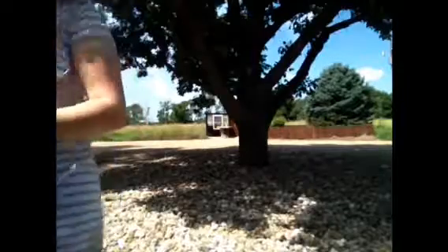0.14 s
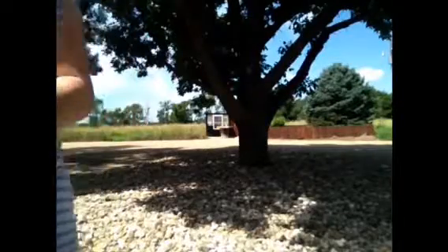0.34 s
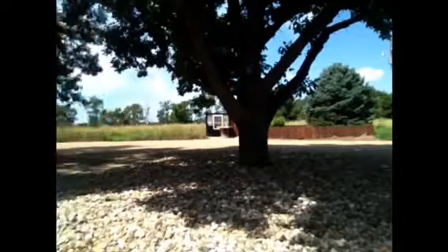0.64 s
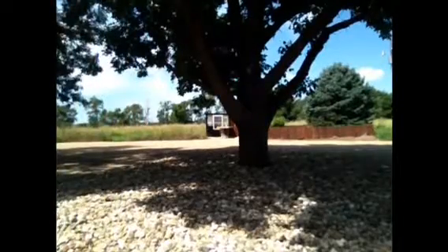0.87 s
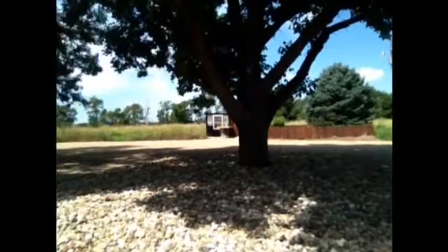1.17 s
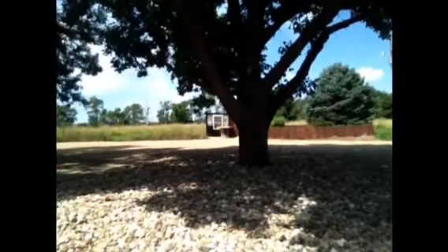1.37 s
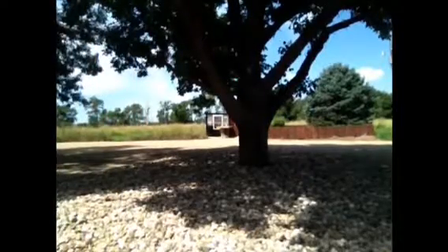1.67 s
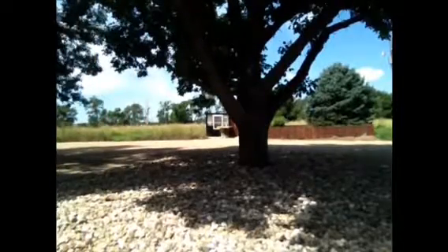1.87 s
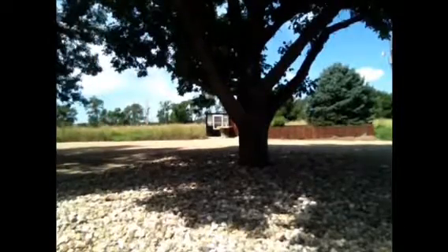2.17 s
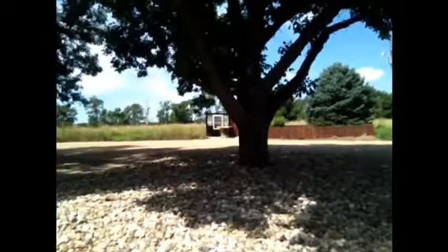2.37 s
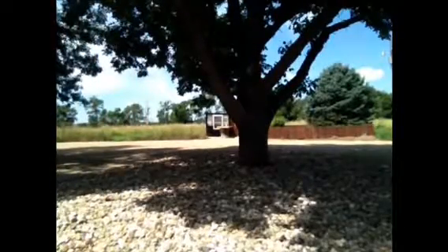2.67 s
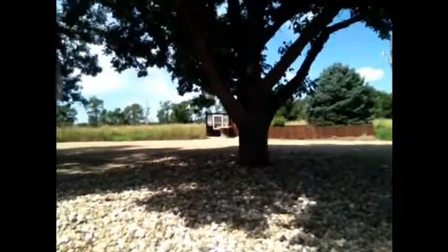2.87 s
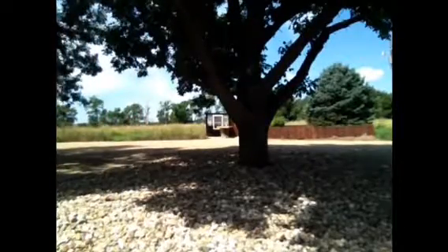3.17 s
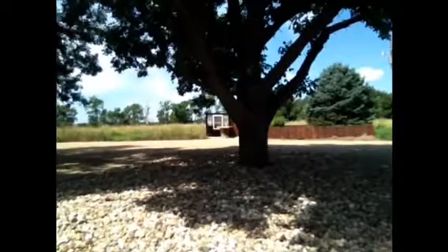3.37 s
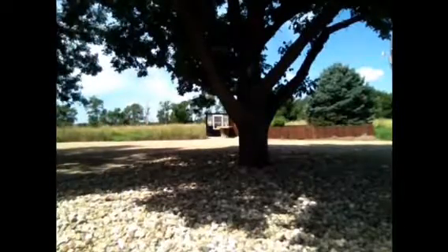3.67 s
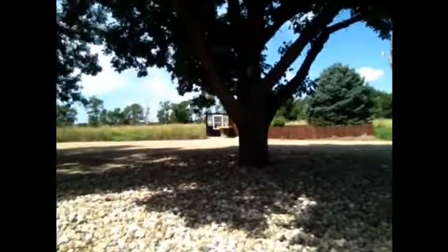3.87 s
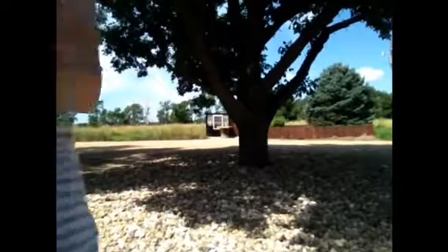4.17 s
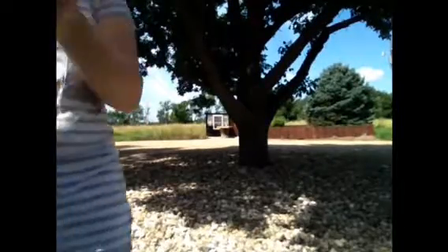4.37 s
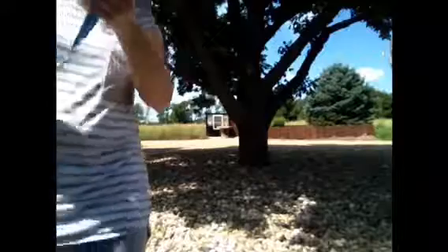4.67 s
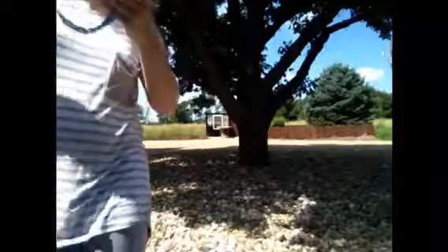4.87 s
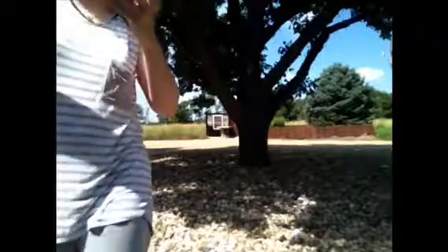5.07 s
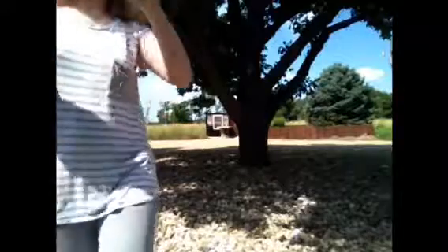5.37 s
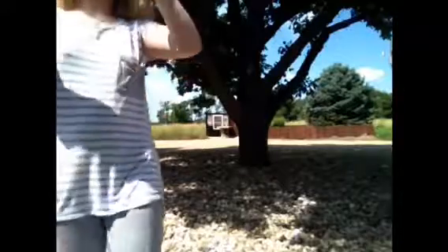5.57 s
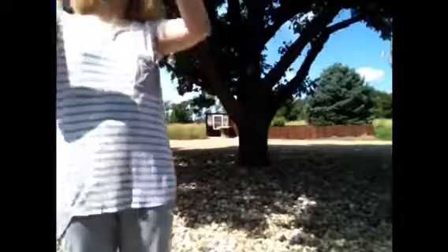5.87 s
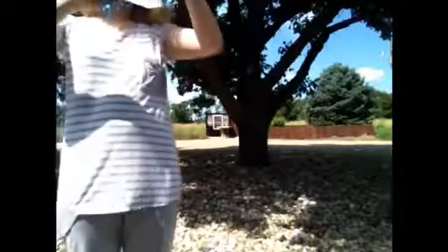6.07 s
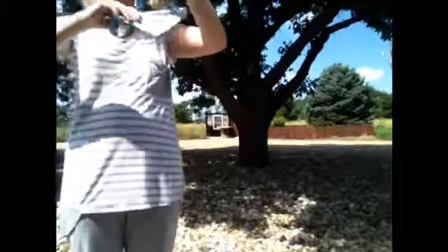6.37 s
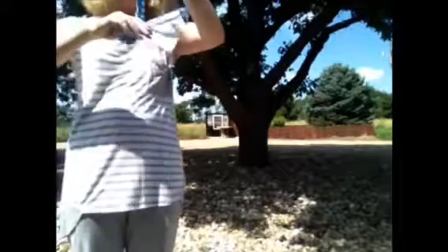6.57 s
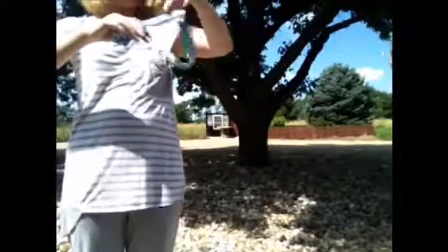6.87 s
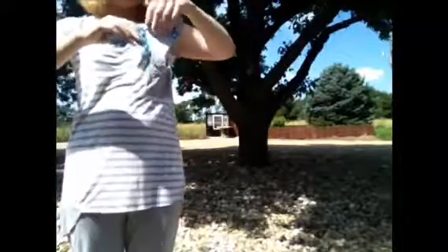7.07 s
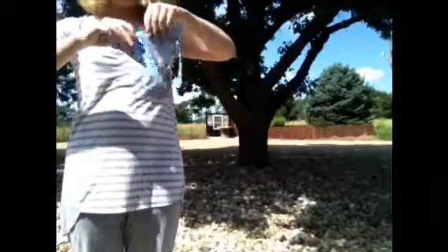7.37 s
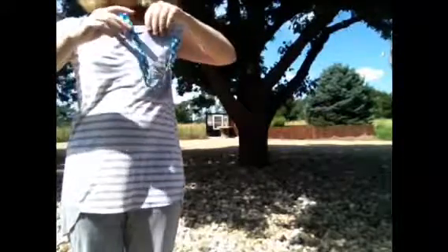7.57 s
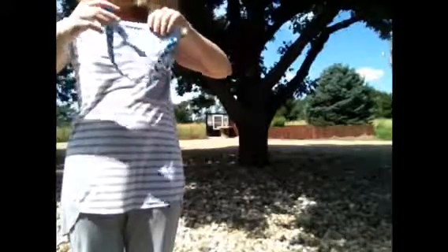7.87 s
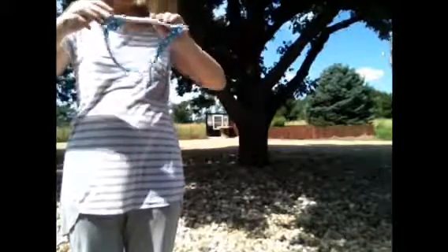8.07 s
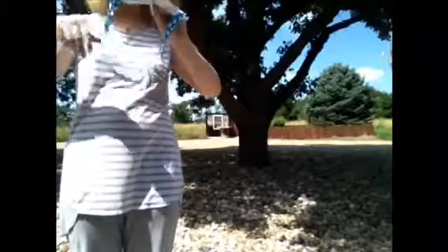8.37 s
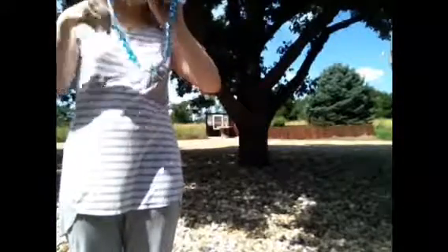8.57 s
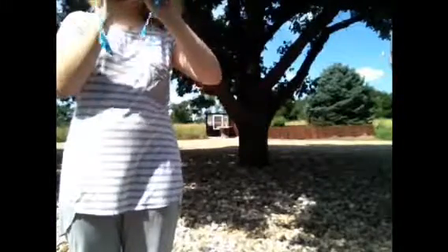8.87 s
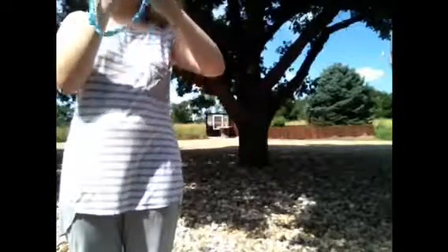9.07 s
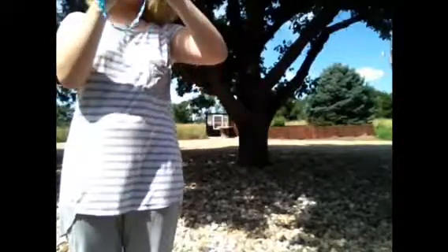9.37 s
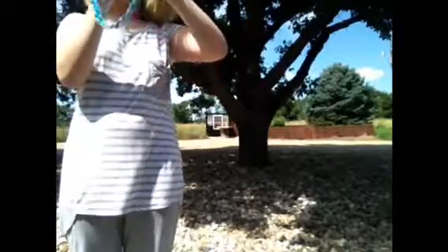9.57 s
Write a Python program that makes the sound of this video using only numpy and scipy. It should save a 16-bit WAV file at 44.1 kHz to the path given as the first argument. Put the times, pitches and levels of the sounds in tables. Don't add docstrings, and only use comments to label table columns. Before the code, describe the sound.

Quiet yard under a big tree, leaves hissing faintly over a distant hum. Close to a small outdoor microphone, a loose board is knocked, a wooden lid taps and slams hard. A little latch ticks, its hinge scrapes thinly, and a metal catch snaps and rattles. Afterwards soft wind rumbles, stones click underfoot, and thin high birds whistle, busiest near the end.

```python
import sys
import numpy as np
from scipy import signal
from scipy.fft import rfft, irfft, next_fast_len
from scipy.io import wavfile
from scipy.ndimage import uniform_filter1d

SR = 44100
rng = np.random.default_rng(int(sys.argv[2]) if len(sys.argv) > 2 else 0)


def store_wav(level_fs):
    pcm = np.round(np.clip(np.atleast_2d(level_fs), -1, 1) * 32767)
    wavfile.write(sys.argv[1], SR, pcm.T.astype(np.int16))


def decibels_to_gain(level_db):
    exponent = np.asarray(level_db, float) / 20
    return 10 ** exponent


N = 429093

# (pitch [Hz], level [dB per Hz])
YARD_COLOUR = [(30, -32), (55, -26), (195, -8), (470, -10.5), (1470, -20), (6800, -20.5), (10700, -12),
               (15500, -15)]
# (pitch [Hz], width [Hz], level [dB])
HUM = [(222, 85, -69), (375, 49, -70), (174, 13, -77.5), (221.7, 6.1, -73), (242, 1.9, -72),
       (330, 5.3, -75), (361, 6.21, -71), (400, 20, -74.5), (440.4, 9.5, -70.5), (510.5, 17, -76),
       (10700, 800, -72)]
# (time [s], swell [dB])
BREEZE = [(0.0, 0), (0.43, -1), (0.84, -0.5), (1.41, -3), (2.001, 0), (2.44, -1), (2.7, -3), (3.39, -1.5),
          (3.87, -2.5), (4.44, 0), (5.23, 0), (5.72, -4), (6.1, -1), (7.15, -1.1), (8.24, -1), (8.43, -1.3),
          (9.21, -2), (9.73, -0.1)]
YARD_DB = -55.5
CROWN_SWING, CROWN_DB = 2, -0.5

# (start [s], length [s], first pitch [Hz], level [dB])
FLICKS = [
    (0.241, 0.013, 5700, -47.5),
    (.25, .008, 6900, -55),
    (4.147, 0.016, 5600, -55.5),
    (7.354, 0.01, 6600, -60),
    (8.545, 0.012, 5740, -52.5),
    (8.568, 0.02, 6800, -60),
]
CHIPS = [(.297, 0.017, 6740, -45), (.538, 0.066, 6380, -63.5), (1.19, .02, 2550, -66),
         (7.33, .022, 6630, -60), (2.33, 0.04, 6400, -63), (2.335, .03, 5900, -65),
         (4.195, 0.023, 6740, -55), (6.35, 0.038, 6700, -68), (7.461, 0.045, 6400, -61),
         (8.427, 0.028, 4460, -64), (8.552, 0.023, 6470, -48), (8.93, 0.016, 3700, -60.5),
         (9.5, .037, 5430, -71.5), (1.27, 0.072, 7200, -69), (3.82, 0.097, 4880, -67)]
SLURS = [
    (0.31, 0.056, 6490, -53.5),
    (.6, 0.045, 5750, -72),
    (7.4, 0.05, 6610, -52),
    (8.175, 0.03, 4900, -59.5),
    (8.607, 0.032, 6490, -49),
    (9.434, 0.039, 6140, -61),
]
HELD_NOTES = [(0.019, 0.13, 4660, -70), (0.251, 0.056, 6000, -57), (0.708, .098, 5720, -78),
              (1.349, 0.035, 2480, -68), (1.585, 0.15, 4650, -67), (1.61, .12, 7100, -79),
              (1.78, .06, 6950, -72), (2.01, 0.054, 4110, -66), (2.049, .08, 4700, -77),
              (2.098, 0.088, 3330, -69.5), (2.22, 0.18, 5510, -69), (8.63, 0.026, 6430, -60),
              (8.8, 0.049, 4250, -73), (3.94, 0.04, 4430, -68), (4.599, 0.3, 7000, -75),
              (4.81, .077, 6000, -74), (6.13, .05, 7060, -69), (7.07, .2, 6770, -72.5),
              (7.68, .085, 6250, -69.5), (8.06, 0.12, 6730, -71), (8.26, 0.076, 5630, -67),
              (8.653, 0.055, 4400, -72), (9.04, .05, 4380, -67)]
DIVES = [
    (8.4, 0.047, 5690, -61),
    (8.63, 0.038, 5350, -61.5),
    (9.052, 0.044, 4460, -65.5),
]
CLIMBS = [
    (8.745, 0.085, 3450, -63),
]
LOW_CALL = [
    (6.01, 0.22, 3236, -73.5),
]
DARTS = [
    (8.943, 0.048, 3840, -62),
]
FAR_SLURS = [
    (1.975, 0.09, 5950, -70),
    (5.84, 0.11, 7000, -74.5),
    (6.73, .075, 6750, -67.5),
    (8.11, 0.092, 6700, -70),
    (8.31, 0.083, 7000, -69.5),
    (9.4, 0.049, 7100, -69),
]
LONG_SLURS = [
    (1.445, .088, 6450, -53.5),
    (5.559, 0.057, 6550, -57),
    (2.385, .068, 6570, -53),
]
# (glide [Hz/s], echo [dB re note], lingering at the low end [power], hoarseness [share])
GLIDES = [
    (125000, 0.5, 0.99, 0.044),
    (-5000, -4.5, 1.2, .009),
    (-15500, -1.5, .9, 0.011),
    (-650, -5, 1.2, .009),
    (-28000, -3.5, 1.3, .009),
    (20999, -8, 1.2, .012),
    (760, -7.5, 1.17, .006),
    (52999.5, -2.5, 1.3, .015),
    (-14000, 4, 1.4, .012),
    (-20000, 0.5, .9, .005),
]
LONG_FALL_DB = -8.5

# (start [s], length [s], resonance [Hz], level [dB])
SQUEAKS = [
    (0.78, 0.42, 4140, -67.5),
    (2.215, 0.11, 4290, -65.5),
    (2.26, .09, 3400, -69.5),
    (2.585, 0.04, 4470, -64),
    (2.78, 0.066, 4600, -61),
    (2.4, 0.096, 4300, -72),
    (3.4, 0.12, 4470, -68),
    (6.84, 0.46, 5400, -73),
]
HISSES = [(.825, 0.054, 9500, -58.5), (1.385, 0.03, 6600, -61), (2.48, 0.42, 4000, -63),
          (2.72, 0.18, 5700, -66), (2.92, .31, 4700, -66), (2.93, 0.28, 6100, -65), (5.49, .06, 6700, -63),
          (7.33, .05, 7000, -62.5), (4.3, .48, 11500, -65), (4.75, .48, 11500, -65),
          (7.45, .45, 11500, -64), (7.8, .45, 11800, -64), (8.05, .25, 14000, -65),
          (5.97, 0.4, 11000, -61.5)]
RUSTLES = [(.823, 0.05, 1880, -55.5), (2.172, 0.013, 3280, -55), (1.99, .11, 800, -51),
           (1.57, .08, 270, -54), (3.46, 0.092, 687, -48), (3.47, 0.065, 1290, -61),
           (3.525, 0.035, 400, -57.5), (4.36, 0.05, 3500, -69), (4.52, 0.054, 1890, -64.5),
           (5.06, 0.072, 2660, -68), (5.634, 0.064, 4710, -56.5), (9.0, 0.093, 740, -69.5)]
SCUFFS = [
    (5.045, .05, 2800, -62),
    (5.325, 0.057, 2700, -57),
    (1.2, 0.021, 1500, -59),
    (1.429, .01, 2000, -48),
    (3.485, .05, 1700, -59),
    (.15, 0.037, 2000, -64),
]
SQUEAK_WIDTH, HISS_WIDTH, RUSTLE_WIDTH, SCUFF_WIDTH = 0.064, .2, 0.88, .4

# (time [s], peak [dB], pitch [Hz], level of the wide crack
# [dB])
PEBBLES = [(0.161, -46, 1800, -14), (0.193, -36, 2430, -4), (0.8195, -46, 3000, -6),
           (0.819, -39, 1540, -11), (4.3784, -39.5, 3140, -9), (4.393, -53.5, 2900, 6),
           (4.561, -40.5, 1520, -10), (4.7083, -38, 3080, -16), (4.708, -56, 5200, 8),
           (5.023, -45, 5440, -3), (5.0465, -52, 4500, 4), (5.064, -40.5, 3100, -3), (5.085, -52, 5200, 0),
           (5.061, -41, 1980, -2), (5.315, -49, 4800, 7), (5.346, -38, 2570, -3), (5.346, -42, 5200, 3),
           (5.6367, -49, 3800, 7), (5.656, -35.5, 5250, 8.5), (6.5318, -46, 4000, 7),
           (1.3226, -49, 3500, 3), (1.394, -53, 6000, 3), (1.937, -39, 7010, 6), (9.026, -54, 1900, 2),
           (9.026, -43, 895, -8)]
# (time [s], peak [dB], first tone [Hz], second tone [Hz], second tone [dB re first])
TICKS = [
    (.288, -54, 1700, 2100, -6),
    (2.573, -56, 1600, 1900, 0),
    (2.594, -55, 2700, 3100, -3),
    (2.623, -48, 7150, 5200, -4),
    (2.635, -45, 7360, 9300, -1),
    (2.707, -51, 750, 1500, -4),
    (6.532, -53.5, 2760, 4400, 4),
    (7.138, -58, 3300, 4600, 2),
    (7.316, -55, 3500, 4500, 2),
    (7.412, -61, 2400, 2100, -4),
]
# (time [s], peak [dB], pitch [Hz])
BUMPS = [(.86, -46, 190), (0.875, -40, 220), (0.912, -41, 220), (1.438, -38, 153), (1.518, -45, 130),
         (1.915, -32, 151), (2.03, -44, 200), (3.67, -50, 226), (3.805, -52.5, 208.6), (3.882, -46, 135),
         (3.999, -60, 210), (4.394, -49, 132), (4.42, -56, 222), (5.456, -44.5, 153), (5.69, -51.5, 232),
         (5.819, -58.5, 224.4), (5.95, -54, 140), (6.08, -51, 140), (6.113, -44, 150), (6.218, -57, 142),
         (6.901, -53, 231), (8.1, -56.5, 248)]

# (time [s], peak [dB], blow pitch [Hz], crack [dB re blow], ring [dB re blow])
BOARD_KNOCKS = [
    (.8755, -45, 330, -30, -2),
    (.913, -47, 600, -20, 5),
    (.925, -49, 1700, -15, -14),
    (.9447, -17, 1390, -10, -2),
    (.963, -35, 810, -7, -1),
    (.978, -46, 605, -25, -3),
    (1.046, -54, 920, -20, 7.5),
]
RIM_KNOCKS = [
    (1.313, -55, 1420, -30, -5),
    (1.3232, -21.5, 1200, -20, -2.5),
    (1.355, -45.5, 500, -30, 7.5),
]
LID_KNOCKS = [
    (1.429, -36, 1250, -14, -6),
    (1.455, -42, 650, -25, -12),
    (1.4372, -13.5, 930, 1, -3),
    (1.508, -35.5, 700, -36, 6),
    (1.538, -35.5, 790, -10, 5),
    (1.57, -45, 400, -44, 1),
]
SLAM_KNOCKS = [
    (1.9095, -22.5, 1000, -4, 2),
    (1.9147, -8.5, 1160, 1.5, 0.5),
    (1.938, -19, 900, -22, -1.5),
    (1.944, -17.5, 870, -16, -6.5),
    (1.97, -27.5, 590, -30, -11),
    (1.99, -33.5, 765, -23, -1),
]
CATCH_KNOCKS = [
    (3.2147, -12.5, 1510, -41, -7),
    (3.222, -30, 1363, -4.5, 1),
    (3.256, -37, 1400, -25, -7),
]
TONGUE_KNOCKS = [
    (3.4242, -18.5, 950, -25, -5),
    (3.433, -28, 1500, -6.5, 4.5),
    (3.4975, -27.5, 1610, -28, -9.5),
    (3.517, -36.5, 950, -26, -3),
]
# (pitch [Hz], level [dB], time to fall 60 dB [s])
BOARD_MODES = [(343.5, -11, 0.18), (590, 4, 0.022), (764, -15, 0.036), (940, 0.5, 0.069),
               (1114, -17, 0.039), (1390, 1.5, 0.049), (1660, 2.5, 0.046), (1770, -3, 0.074),
               (3020, -8, 0.046), (3500, -6, 0.068)]
RIM_MODES = [(400, 1, 0.059), (553, -1.5, 0.041), (767, 5, 0.041), (1077, -14, .03), (1470, 0, 0.049),
             (1660, 0, 0.035)]
LID_MODES = [(248, -15, 0.079), (391, -5.5, 0.095), (524, 2, 0.044), (700, -3.5, 0.025), (930, -3, 0.027),
             (1400, -1, 0.035), (1680, -5, .03), (3100, -11, .018), (4200, -9, .018)]
BOX_MODES = [(258.6, -6, 0.056), (385, -8, 0.074), (445, 4, 0.056), (612, -7.5, 0.073), (656, 0.5, 0.062),
             (759, -3, .06), (920, -2, 0.062), (1061, -11, 0.073), (1177, -1, 0.087), (1350, -22.5, 0.051),
             (1770, -20.5, .04), (2340, -3.5, 0.035), (2930, -12, 0.026)]
PLATE_MODES = [(248, -5, 0.097), (434, -8, 0.11), (567, -17, 0.12), (668, 1.5, 0.078), (900, 5, 0.045),
               (1210, 1, 0.027), (1380, -7, 0.063), (1563, 8, 0.022), (1681, 10.5, 0.041), (2270, 1, 0.089),
               (2550, 2, 0.049), (4020, 4, 0.058), (4700, -10, .05)]
TONGUE_MODES = [(245, -14, 0.12), (335, -14, 0.12), (676, -9.5, 0.072), (940, -15, 0.044),
                (1493, 3.5, 0.037), (1595, -18, 0.037), (2230, -0.5, 0.06), (2380, 3, 0.05),
                (2988, -18, .04), (3970, -5.5, 0.068), (4600, -5, 0.056)]
# (rattle [dB re ring], rattle time to fall 60 dB [s], fizz [dB re crack],
# dull thud [dB re ring], thud centre [Hz])
RATTLES = [
    (-16, 0.16, -30, -9.5, 460),
    (-25, 0.34, -13, -12.5, 380),
    (-17, 0.223, -34.5, -10.5, 340),
    (-17, 0.21, -18.5, -10.5, 434),
    (-14.5, 0.16, -0.5, -10.5, 1050),
    (-10, .15, -0.5, -10, 670),
]
SOFT_DB_PER_OCT = 10

# (time [s], peak [dB], upper tone [dB re lower], crack [dB re lower])
LATCH = [(2.176, -53.5, 2, 9), (2.488, -51, -9, -5), (2.6222, -34.5, 0.5, 1.5), (2.6349, -42.5, 3, 8),
         (2.6596, -51, 3, -14), (2.674, -47, -14, -2), (2.858, -51, -15, -12), (2.875, -52, 3, 7),
         (2.922, -48, -15, -12), (3.402, -56, -15, -15), (2.775, -60, 8, -8), (2.7995, -48, 6, 3),
         (2.841, -40.5, -4, -7), (2.868, -44.5, 7, 5.5), (2.891, -54, 2, 3), (2.9288, -44, -14, -5),
         (3.0237, -52.5, -4, 4), (3.042, -46.5, -12, -12), (3.092, -40, -9, -10), (3.107, -49, -13, 0),
         (3.1672, -52.5, -27, -7), (3.1832, -49, -12, -14), (3.3438, -54.5, -2, -4),
         (3.544, -33.5, -26, -18), (3.559, -45, -7, -9), (3.571, -48, -10, -16.5)]
# (pitch [Hz], time to fall 60 dB [s])
LATCH_MODES = [(1390, 0.013), (2340, 0.018), (2900, 0.011)]
LATCH_RISE_S, LATCH_SPREAD = .002, .025

# (start [s], length [s], first pitch [Hz], last pitch [Hz], level [dB])
RUBS = [(2.47, .2, 4300, 4450, -66), (2.599, .26, 4450, 4610, -66), (2.52, .18, 3250, 3400, -65.5),
        (2.643, 0.28, 3390, 3530, -65), (2.68, .16, 4800, 4800, -68), (2.919, 0.096, 4150, 4580, -66),
        (2.927, 0.15, 5700, 6340, -64), (2.967, .24, 6750, 6800, -65), (2.967, .1, 4880, 5100, -65),
        (3.085, .13, 4020, 4280, -64), (3.09, 0.15, 5500, 5600, -63), (3.1, 0.14, 4700, 4900, -64),
        (3.102, 0.14, 6000, 6100, -64), (4.945, 0.073, 501, 1400, -65.5)]
RUB_WIDTH_HZ = 250

# (time [s], rumble at the crest [dB])
GUSTS = [(3.62, -77), (3.891, -67.5), (4.05, -71.5), (4.42, -71), (4.8, -72), (5.15, -75), (5.46, -66),
         (5.68, -69), (5.9, -66), (6.14, -67.5), (6.66, -69), (6.95, -75.5), (7.63, -78), (8.14, -73)]
GUST_RISE_DB_S, GUST_FALL_DB_S, CALM_DB = 130, 54, -92

HOLE_LEVEL, HOLE_DB, HOLE_FROM_HZ, MOTTLE_DB = 1.75, -22, 12900, 1.3


def band(x, hz, width):
    return signal.lfilter(*signal.iirpeak(min(hz, .45 * SR), hz / width, fs=SR), x)


def unit(x):
    return x / np.sqrt(np.mean(x ** 2))


def peak(x):
    return x / np.max(np.abs(x))


def add(out, s, x):
    i = max(int(s * SR), 0)
    out[i:i + len(x)] += x[:N - i]


def fade(t, t60):
    return np.exp(-np.log(1000) * t / t60)


def walk(rate):
    k = int(SR / rate)
    steps = np.repeat(rng.standard_normal(N // k + 1), k)
    return 1.3 * uniform_filter1d(uniform_filter1d(steps, k), k)[:N]


def crack(t, noise, t60, hz, width):
    return peak(band(noise * fade(t, t60), hz, width))


def ping(t, hz, t60, rise_s):
    return np.sin(2 * np.pi * hz * t) * fade(t, t60) * (1 - np.exp(-t / rise_s))


def yard():
    t = np.arange(N) / SR
    s, swell_db = np.transpose(BREEZE)
    low = np.interp(t, s, swell_db)
    top = CROWN_SWING * low + CROWN_DB
    size = next_fast_len(N, True)
    freqs = np.arange(size // 2 + 1) * SR / size
    hz, db = np.transpose(YARD_COLOUR)
    air = rfft(rng.standard_normal(size)) * decibels_to_gain(np.interp(np.log(freqs + 1), np.log(hz), db))
    place = 2 * np.log2(freqs / 30 + 1e-9)
    out = np.zeros(N)
    for k in range(19):
        centre = 30 * 2 ** (k / 2)
        share = np.cos(np.pi / 2 * np.clip(place - k, -1, 1)) ** 2
        swell = top if centre > 13000 else low * np.clip((centre - 5000) / 4000, 0, 1)
        flicker = (1.5 if centre < 500 else .5) * walk(5.5)
        out += irfft(air * share, size)[:N] * decibels_to_gain(swell + flicker)
    hum = sum(decibels_to_gain(db) * unit(band(rng.standard_normal(N), hz, width)) for hz, width, db in HUM)
    return decibels_to_gain(YARD_DB - 1.5) * unit(out) + hum


def whistle(length, from_hz, glide, linger, hoarse, fall_db, noise):
    to_hz = from_hz + glide * length
    x = np.arange(int(length * SR)) / (length * SR)
    low, high = min(from_hz, to_hz), max(from_hz, to_hz)
    hz = low * (high / low) ** (x if to_hz > from_hz else 1 - x) ** linger
    hz = hz * (1 + hoarse * unit(band(noise[1], 120., 250.))[:len(x)])
    flutter = decibels_to_gain(3.4 * unit(band(noise[0], 43.0, 92.0))[:len(x)])
    tone = np.sin(2 * np.pi * np.cumsum(hz) / SR)
    return tone * np.sin(np.pi * x) ** 0.27 * flutter * decibels_to_gain(fall_db * x)


def birds():
    out, t = np.zeros(N), np.arange(SR // 2) / SR
    tables = (FLICKS, CHIPS, SLURS, HELD_NOTES, DIVES, CLIMBS, LOW_CALL, DARTS, FAR_SLURS, LONG_SLURS)
    for table, (glide, echo_db, linger, hoarse) in zip(tables, GLIDES):
        fall_db = LONG_FALL_DB if table is LONG_SLURS else 0
        for s, length, from_hz, db in table:
            noise = rng.standard_normal((3, len(t)))
            note = whistle(length, from_hz, glide, linger, hoarse, fall_db, noise[1:])
            scatter = noise[0] * (fade(t, 0.25) + 0.29 * fade(t, 0.7)) * (1 - np.exp(-t / 0.0044))
            echo = signal.fftconvolve(note, scatter / np.sqrt(np.sum(scatter ** 2)))
            add(out, s, decibels_to_gain(db) * note)
            add(out, s, decibels_to_gain(db + echo_db + 2.0) * echo)
    return out


def scrapes():
    out = np.zeros(N)
    kinds = ((SQUEAKS, SQUEAK_WIDTH), (HISSES, HISS_WIDTH), (RUSTLES, RUSTLE_WIDTH), (SCUFFS, SCUFF_WIDTH))
    for table, share in kinds:
        for start, length, hz, db in table:
            noise, n = rng.standard_normal((2, SR // 2)), int(length * SR)
            slips = noise[0] * decibels_to_gain(1.8 * unit(band(noise[1], 95.0, 200.)))
            rub = unit(band(band(slips, hz, share * hz), hz, 3.9 * share * hz))[:n]
            add(out, start, decibels_to_gain(db) * rub * signal.windows.tukey(n, .7))
    return out


def pebbles():
    out, t = np.zeros(N), np.arange(SR // 20) / SR
    for s, peak_db, hz, crack_db in PEBBLES:
        noise = rng.standard_normal((2, len(t)))
        roughness = decibels_to_gain(5.6 * unit(band(noise[0], 300., 400.)))
        stone = peak(ping(t, hz, 0.019, 0.00046) * roughness)
        snap = band(crack(t, noise[1], 0.0032, 1.3 * hz, 4000.0), 0.9 * hz, 4000.)
        add(out, s, decibels_to_gain(peak_db - 7.0) * (stone + decibels_to_gain(crack_db + 11.0) * snap))
    return out


def ticks():
    out, t = np.zeros(N), np.arange(SR // 20) / SR
    for s, peak_db, first_hz, second_hz, second_db in TICKS:
        low = peak(ping(t, first_hz, .018, .0008))
        high = peak(ping(t, second_hz, 0.0097, 0.00072))
        add(out, s, decibels_to_gain(peak_db) * (low + decibels_to_gain(second_db) * high))
    return out


def bumps():
    out, t = np.zeros(N), np.arange(SR // 10) / SR
    for s, peak_db, hz in BUMPS:
        push = np.sin(2 * np.pi * hz * t) * (hz * t) ** 2 * np.exp(-2.5 * hz * t)
        add(out, s, decibels_to_gain(peak_db) * peak(push))
    return out


def knocks(table, modes, rattle_db, t60, fizz_db, thud_db, thud_hz):
    out, t = np.zeros(N), np.arange(SR // 4) / SR
    for s, peak_db, blow_hz, crack_db, ring_db in table:
        chance, noise = rng.standard_normal((len(modes), 2)), rng.standard_normal((3, len(t)))
        swing = np.sin(2 * np.pi * blow_hz * t) * (1 - np.exp(-t * blow_hz * 4.9))
        blow = peak(swing * fade(t, 9.9 / blow_hz))
        body = np.zeros(len(t))
        for (hz, db, ring_t60), (size, shift) in zip(modes, chance):
            reach = decibels_to_gain(db + 0.37 * size - SOFT_DB_PER_OCT * max(np.log2(hz / blow_hz), 0))
            hz = hz * (1 + 0.013 * shift)
            struck = ping(t, hz, ring_t60, 0.0012)
            rattle = peak(band(noise[0] * fade(t, t60 * (600 / hz) ** 0.59), hz, 55 + 0.042 * hz))
            body += reach * (np.sign(size) * struck + decibels_to_gain(rattle_db) * rattle)
        thud = crack(t, noise[2] * (1 - np.exp(-t / 0.0026)), t60, thud_hz, 0.7 * thud_hz)
        thud = peak(band(thud, thud_hz, 1.6 * thud_hz))
        snap = band(crack(t, noise[1], 0.02, 2280.0, 1500.), 2020.0, 2400.0)
        snap = snap + decibels_to_gain(fizz_db) * crack(t, noise[2], 0.093, 5800.0, 6400.0)
        ring = peak(body) + decibels_to_gain(thud_db) * thud
        add(out, s, decibels_to_gain(peak_db) * (blow + decibels_to_gain(crack_db) * snap + decibels_to_gain(ring_db) * ring))
    return signal.sosfilt(signal.butter(3, 150., "highpass", fs=SR, output="sos"), out)


def lid():
    parts = ((BOARD_KNOCKS, BOARD_MODES), (RIM_KNOCKS, RIM_MODES), (LID_KNOCKS, LID_MODES),
             (SLAM_KNOCKS, BOX_MODES), (CATCH_KNOCKS, PLATE_MODES), (TONGUE_KNOCKS, TONGUE_MODES))
    return sum(knocks(*part, *rattle) for part, rattle in zip(parts, RATTLES))


def latch():
    out, t = np.zeros(N), np.arange(SR // 10) / SR
    for s, peak_db, upper_db, crack_db in LATCH:
        chance, noise = rng.standard_normal(3), rng.standard_normal(len(t))
        low, high, top = [peak(ping(t, hz * (1 + LATCH_SPREAD * c), t60, LATCH_RISE_S))
                          for (hz, t60), c in zip(LATCH_MODES, chance)]
        snap = band(crack(t, noise, 0.019, 5300.0, 5500.0), 5600.0, 5000.)
        hard = decibels_to_gain(crack_db + 4.0) * snap + decibels_to_gain(crack_db - 4.5) * top
        add(out, s, decibels_to_gain(peak_db - 3.5) * (low + decibels_to_gain(upper_db) * high + hard))
    return out


def rubs():
    out = np.zeros(N)
    smooth = signal.butter(2, RUB_WIDTH_HZ / 2, fs=SR, output="sos")
    for start, length, from_hz, to_hz, db in RUBS:
        noise, n = rng.standard_normal((2, SR // 3)), int(length * SR)
        slow = signal.sosfilt(smooth, noise)[:, -n:]
        turn = 2 * np.pi * np.cumsum(np.linspace(from_hz, to_hz, n)) / SR
        rub = unit(slow[0] * np.cos(turn) + slow[1] * np.sin(turn))
        add(out, start, decibels_to_gain(db) * rub * signal.windows.tukey(n, .6))
    return out


def gusts():
    t = np.arange(N) / SR
    hills = [db - np.maximum(GUST_RISE_DB_S * (s - t), GUST_FALL_DB_S * (t - s)) for s, db in GUSTS]
    crest = np.max(hills, axis=0)
    rumble = band(band(rng.standard_normal(N), 157.0, 90.), 92.0, 154.0)
    return unit(rumble) * decibels_to_gain(np.maximum(crest, CALM_DB) + 3.0 * walk(14.) + 3.0)


def scene():
    t = np.arange(SR // 3) / SR
    walls = band(band(rng.standard_normal(len(t)), 500.0, 1440.0), 630.0, 2500.)
    walls = walls * fade(t, 0.23) * (t > .004)
    near = lid() + latch() + pebbles() + scrapes() + rubs() + ticks()
    slap = signal.fftconvolve(near, walls / np.sqrt(np.sum(walls ** 2)))[:N]
    near = near + decibels_to_gain(-27.0) * slap
    return (near + bumps() + gusts() + birds() + yard())[None]


def holes(x):
    hz, _, frames = signal.stft(x, SR, nperseg=1024)
    chance = rng.standard_normal(frames.shape[-2:])
    chance = unit(uniform_filter1d(uniform_filter1d(chance, size=3, axis=0), size=7, axis=1))
    edge = HOLE_LEVEL + np.where(hz > HOLE_FROM_HZ, 0, np.where(hz > 5500, .8, 9))[:, None]
    depth = np.clip((chance - edge) / .3 + 1, 0, 1)
    frames = frames * decibels_to_gain(-MOTTLE_DB * chance + HOLE_DB * depth)
    return signal.istft(frames, SR, nperseg=1024)[1][..., :N]


def band_limit(x):
    return signal.sosfilt(signal.butter(12, 15370, fs=SR, output="sos"), x)


def record(dry):
    thin = signal.sosfilt(signal.butter(2, 45., "highpass", fs=SR, output="sos"), dry)
    thin = signal.sosfilt(signal.ellip(10, .2, 80, 15300, fs=SR, output="sos"), thin)
    return band_limit(holes(thin))


dry = scene()
out = record(dry)
store_wav(out)
```